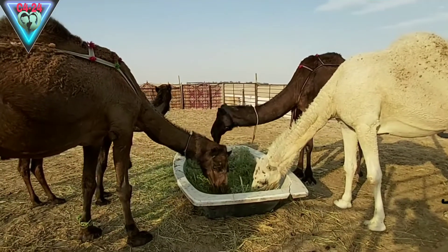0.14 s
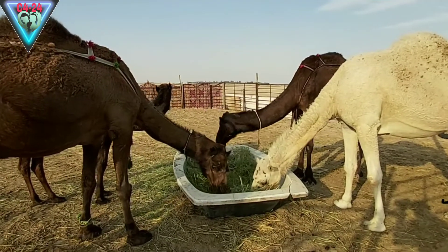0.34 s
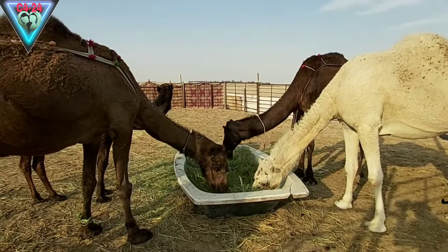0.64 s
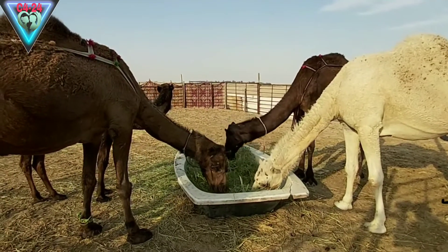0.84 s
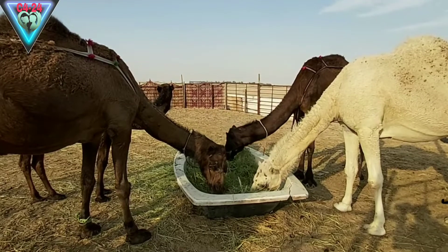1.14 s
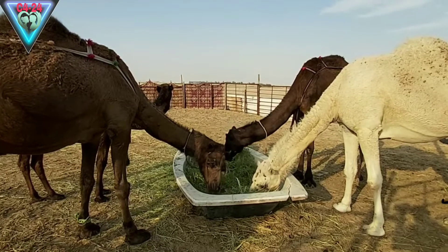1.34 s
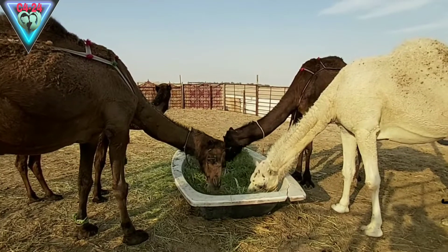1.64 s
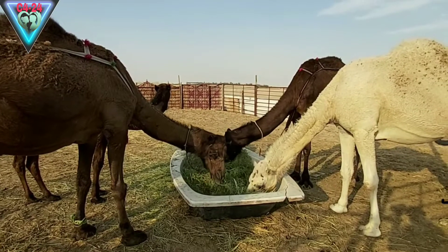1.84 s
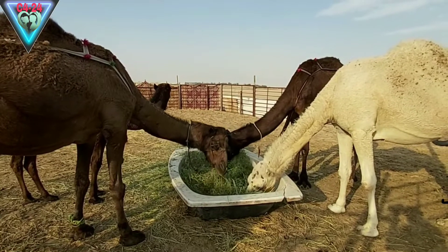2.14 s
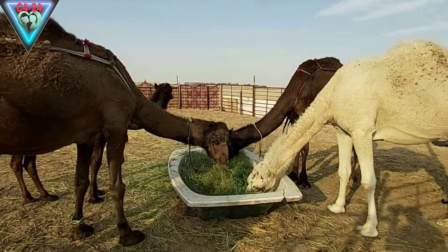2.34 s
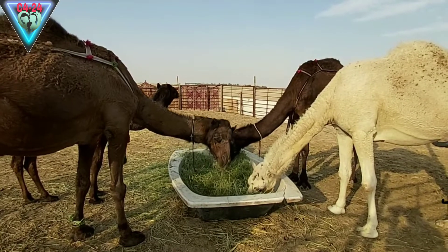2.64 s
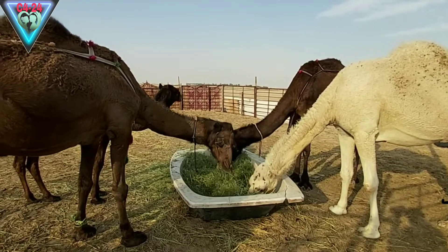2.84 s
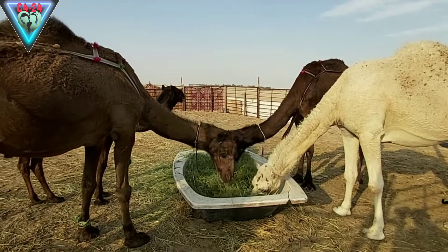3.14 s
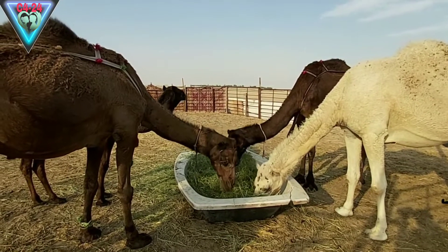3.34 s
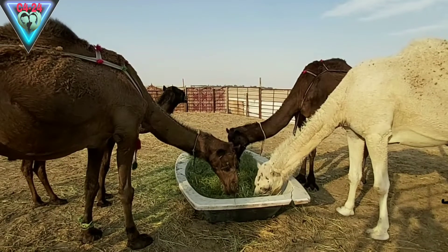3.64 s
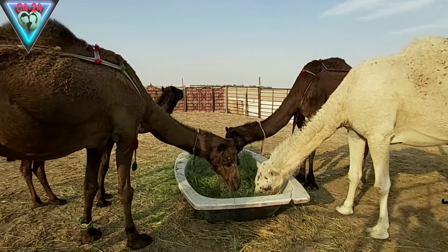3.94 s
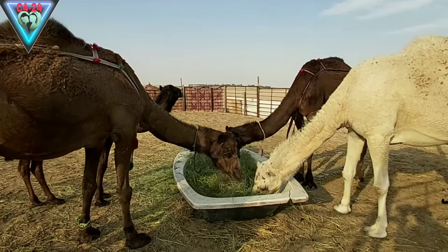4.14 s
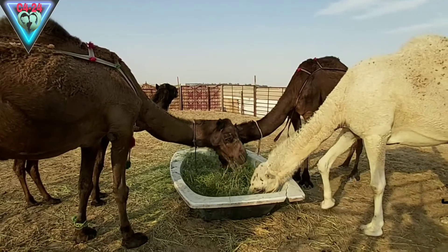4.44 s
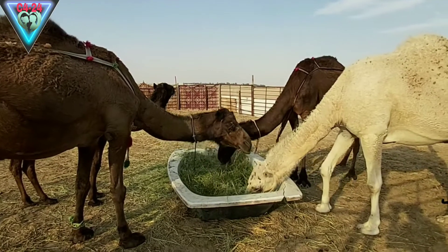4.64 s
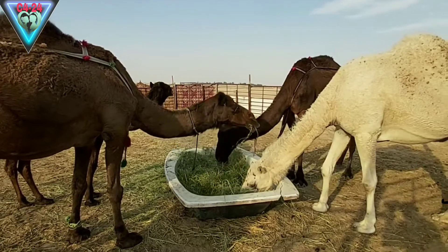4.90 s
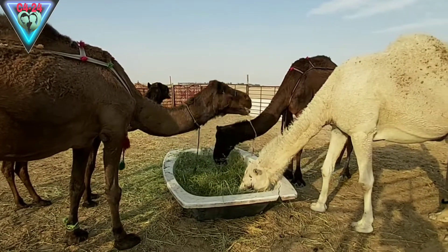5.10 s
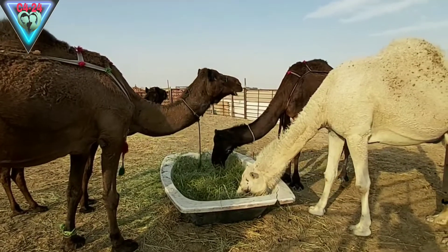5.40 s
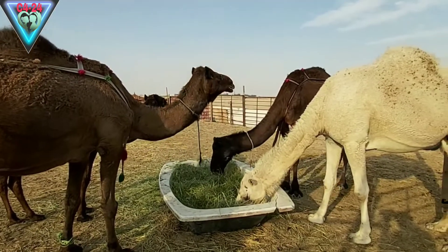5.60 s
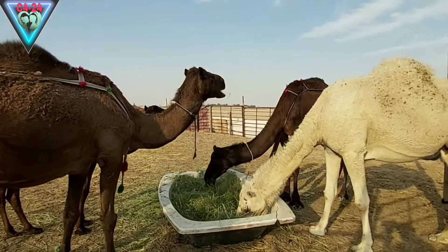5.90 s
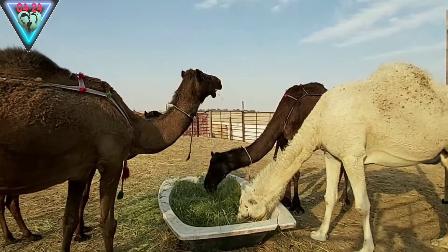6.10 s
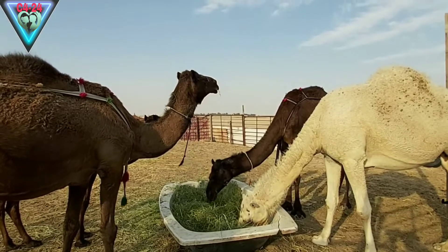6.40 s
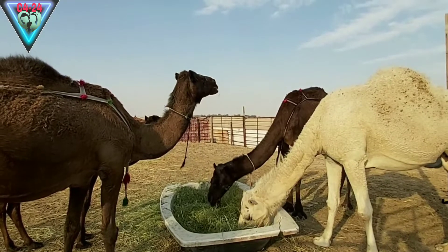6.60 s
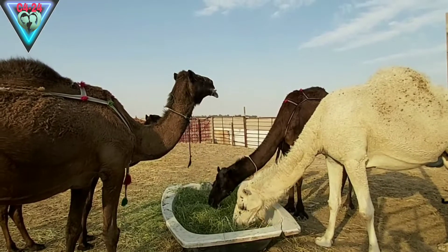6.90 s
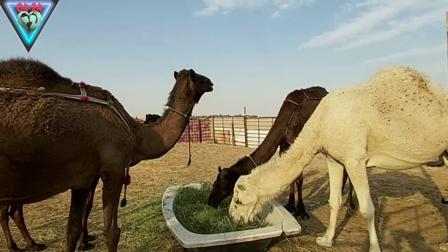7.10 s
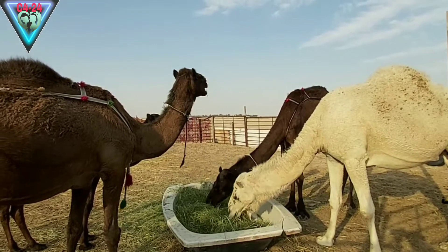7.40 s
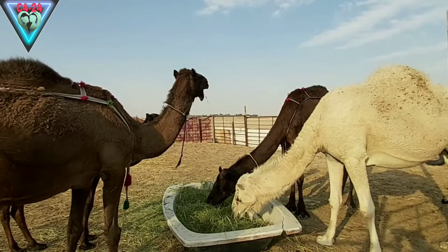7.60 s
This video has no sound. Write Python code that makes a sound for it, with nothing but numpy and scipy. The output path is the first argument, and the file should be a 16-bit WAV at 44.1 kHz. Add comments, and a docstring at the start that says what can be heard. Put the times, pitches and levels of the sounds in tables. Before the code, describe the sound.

Two husky rooster crows from the right, over low rumbling wind with dull thumps, faint hiss and small dry snaps of hay.

```python
"""Open farm pen, two microphone ports in gusty wind, a rooster off to the right crowing twice.
Wind and hiss are shaped noise that rises and falls by table; eddies thump the ports with short pushes.
Camels at a feed trough snap hay (decaying noise bursts) and rustle it (grains ringing the trough).
Each crow has a husky lead-in, short rougher notes and a long cleaner note that sags and ends in a rasp;
low croaks join the notes. A syrinx of a few strong partials, with throat noise, sings it all."""
import sys
import numpy as np
from scipy import signal
from scipy.fft import rfft, irfft
from scipy.io import wavfile
from scipy.ndimage import uniform_filter1d

SR = 44100
rng = np.random.default_rng(int(sys.argv[2]) if len(sys.argv) > 2 else 0)


def unload_audio(sound):
    """Save the sound as a 16-bit wav file, at the path given as the first command line argument."""
    columns = np.transpose(np.atleast_2d(sound))
    # keep every value between -1 and 1, then stretch to whole-number steps
    steps = np.round(np.clip(columns, -1, 1) * 32767)
    wavfile.write(sys.argv[1], SR, steps.astype(np.int16))


N = 341775
TIME = np.arange(N) / SR


def amp(db):
    """Decibels to gain."""
    return 10 ** (np.asarray(db) / 20)


def unit(x):
    """Scales to rms 1."""
    return x / np.sqrt(np.mean(x ** 2) + 1e-20)


def curves(rows, t):
    """The columns of a table, joined by straight lines in time."""
    s, *columns = np.transpose(rows)
    return [np.interp(t, s, c) for c in columns]


def colour(x, points):
    """Filters by a spectrum given as (f/Hz, level/dB) points."""
    hz, db = np.transpose(points)
    f = np.fft.rfftfreq(x.shape[-1], 1 / SR)
    gain_db = np.interp(np.log(f + 1), np.log(hz + 1), db)
    return irfft(rfft(x) * amp(gain_db), x.shape[-1])


def wander(shape, hz):
    """Smooth chance of rms 1, with changes up to about hz."""
    z = rng.standard_normal(shape)
    f = np.fft.rfftfreq(z.shape[-1], 1 / SR)
    return unit(irfft(rfft(z) / (1 + (f / hz) ** 4), z.shape[-1]))


def lowpass(x, hz):
    """The part of a sound below hz, without delay."""
    return signal.sosfiltfilt(signal.butter(2, hz, fs=SR, output="sos"), x)


def resonate(x, modes):
    """A bank of steep resonances: each one is passed twice."""
    out = 0
    for hz, width, db in modes:
        b, a = signal.iirpeak(hz, hz / width, SR)
        once = signal.lfilter(b, a, x)
        out = out + amp(db) * signal.lfilter(b, a, once)
    return out


def pan(db):
    """Left and right gains whose mean is 1, from the left port's level over the right in dB."""
    left = amp(np.atleast_1d(db))
    return 2 * np.array([left, np.ones_like(left)]) / (1 + left)


def add(mix, s, sound):
    """Mixes a sound in at time s."""
    part = mix[..., max(round(s * SR), 0):][..., :sound.shape[-1]]
    part += sound[..., :part.shape[-1]]


# wind at the ports: (t/s, level/dB before the trim)
GUSTS = [(0.0, -44.5), (0.11, -50.5), (0.15, -43.5), (0.19, -47), (0.37, -50.5), (0.5, -42.5),
         (0.58, -45.5), (0.67, -43), (0.71, -54), (0.88, -31.5), (0.97, -40), (1.12, -33.5), (1.19, -38.5),
         (1.25, -30.5), (1.47, -42.5), (1.66, -37), (1.7, -47), (1.79, -33.5), (1.83, -44), (1.9, -32),
         (1.94, -50.5), (1.98, -38.5), (2.11, -37), (2.46, -56), (2.63, -41.5), (2.81, -54.5), (2.91, -37),
         (3.0, -36.5), (3.02, -45.5), (3.3, -36), (3.43, -54.5), (3.5, -53), (3.58, -63.5), (3.67, -52),
         (3.75, -61.5), (3.84, -51.5), (3.95, -70), (4.1, -50), (4.29, -57.5), (4.58, -31.5), (4.62, -43),
         (4.77, -35.5), (5.05, -52.5), (5.2, -47), (5.52, -48.5), (5.65, -33.5), (5.72, -52.5), (5.76, -42),
         (6.28, -44.5), (6.32, -33.5), (6.37, -47.5), (6.48, -42.5), (6.52, -54), (6.65, -49.5),
         (6.78, -65.5), (6.86, -50), (7.1, -69.5), (7.21, -49.5), (7.34, -66), (7.75, -90)]
# spectrum of the turbulence: (f/Hz, relative level/dB per Hz)
BUFFET = [(13, -42), (22, -32.5), (49, 0.5), (97, 4), (232, -6), (300, -0.5), (338, 0), (381, -5.5),
          (421, -4.5), (523, -13.5), (777, -24), (1050, -33), (1350, -41), (2500, -51), (3250, -85.5),
          (5500, -120)]


def wind(level_db=3.0, lumps_db=5.0, lumps_hz=35, split_hz=230, brighten=0.32, usual_db=-41,
         low_side_db=5, high_side_db=-2, sway_db=2.0, sway_hz=6):
    """Each port has its own lumpy turbulence; stronger gusts shed smaller eddies and sound brighter."""
    gust_db = curves(GUSTS, TIME)[0]
    side_db = sway_db * wander(N, sway_hz)  # the ports take turns in the wind
    flow = unit(colour(rng.standard_normal((2, N)), BUFFET))
    rumble = lowpass(flow, split_hz)
    bright_db = brighten * np.minimum(gust_db - usual_db, 5)
    flicker = unit(amp(3.16 * wander((2, N), 66)))
    flutter = (flow - rumble) * amp(bright_db) * flicker
    lumps = amp(lumps_db * wander((2, N), lumps_hz))
    # eddies share out the strength of their gust: level evened over 1/8 s
    lumps /= np.sqrt(uniform_filter1d((lumps * flow) ** 2, SR // 8))
    both = rumble * pan(side_db + low_side_db) + flutter * pan(side_db + high_side_db)
    return both * lumps * amp(gust_db + level_db)


# swells of the fine hiss: (t/s, level/dB before the trim)
HISS = [(0.0, -67), (0.45, -72), (0.52, -63.5), (0.56, -62), (0.6, -67.5), (1.04, -66), (1.1, -63),
        (1.92, -62.5), (2.01, -60), (2.46, -62.5), (3.17, -62), (3.69, -68), (3.88, -64), (3.97, -68),
        (4.88, -59.5), (4.98, -63.5), (5.33, -60), (5.44, -64.5), (5.83, -61.5), (5.89, -65), (6.39, -64),
        (6.45, -61.5), (6.56, -70.5), (7.1, -69.5), (7.21, -67), (7.45, -74.5), (7.58, -68), (7.75, -75.5)]
# spectrum of the hiss: (f/Hz, relative level/dB)
HISS_COLOUR = [(1500, -6), (2400, -7.5), (3100, -8.5), (4300, -0.5), (6000, -1), (9000, -1.5),
               (12000, -1.5), (14500, -4.5)]
# spectrum of the still air of the yard: (f/Hz, relative level/dB per Hz)
AIR = [(24, -44), (40, 8), (83, 9), (192, -17), (372, 0.5), (654, -18), (1020, -12), (1300, -10.5),
       (2850, -32), (5380, -32.5), (14000, -59)]


def hiss(level_db=4.5, side_db=-5, flicker_db=1.02, air_db=-72, top_hz=8000, brighten=0.43, usual_db=-63):
    """A fine wide noise that brightens as it swells, over the still air of the yard."""
    swell_db = curves(HISS, TIME)[0]
    fine = unit(colour(rng.standard_normal((2, N)), HISS_COLOUR))
    body = lowpass(fine, top_hz)
    fine = body + (fine - body) * amp(brighten * (swell_db - usual_db))
    fine *= amp(swell_db + level_db + flicker_db * wander((2, N), 35)) * pan(side_db)
    air = unit(colour(rng.standard_normal((2, N)), AIR))
    return fine + amp(air_db) * air


# strongest eddies at the ports: (t/s, level/dB before the trim, f/Hz, left over right level/dB)
THUMPS = [(0.136, -31.5, 308, -8), (0.232, -38, 148, -6), (0.251, -29.5, 310, -5), (0.533, -29, 303, -4),
          (0.835, -21, 466, -18), (0.891, -16.5, 400, -5), (1.243, -16.5, 106, 0), (1.276, -21, 240, -2),
          (1.568, -23, 290, 2), (1.89, -25, 150, -11), (2.044, -24, 109.5, 2), (2.646, -24, 291, -3),
          (2.98, -23.5, 350, -17), (3.166, -24, 295, 1), (3.267, -28, 111, 19), (3.661, -32.5, 99, -2),
          (4.332, -30, 107.5, 1), (4.476, -26, 111, 7), (4.494, -21.5, 412, -3), (4.546, -27, 342, -11),
          (4.555, -20.5, 349, -1), (4.571, -30, 108, 8), (4.749, -19.5, 353, -5), (6.094, -28, 260, -1),
          (6.314, -26, 137, 0), (6.634, -35.5, 357, -6), (7.205, -36.5, 244, 1)]


def thumps(level_db=-3, cycles=0.93, spread=0.77):
    """An eddy gives each port a short push of a cycle or two, its phase (rad) differing by port."""
    out = np.zeros((2, N))
    t = np.arange(SR // 16) / SR
    turns = spread * rng.standard_normal((len(THUMPS), 2))
    for (s, db, hz, side_db), turn in zip(THUMPS, turns):
        u = t * hz / cycles  # 1 where the push is strongest
        push = u ** 2 * np.exp(2 * (1 - u)) * np.sin(2 * np.pi * hz * t + turn[:, None])
        add(out, s, amp(db + level_db) * pan(side_db) * push)
    return out


# dry stalks snapping: (t/s, starting level/dB before the trim, time to fall 60 dB/s, centre f/Hz)
SNAPS = [(.250, -54, 0.017, 3500), (3.043, -42, 0.028, 3500), (4.2, -42, 0.017, 5200),
         (4.86, -40.5, 0.25, 2400), (6.441, -28.5, 0.018, 2670), (6.482, -39, 0.057, 2980),
         (7.207, -46, 0.066, 1600), (7.519, -49.5, 0.024, 1800)]
# hay dragged in the trough: (t/s of the middle, length/s, level/dB before fades and pan)
SCUFFS = [(4.849, 0.049, -49.5), (6.443, 0.1, -48), (6.448, 0.01, -44), (7.2, 0.21, -59.5),
          (7.202, 0.029, -52.5), (7.237, 0.012, -54), (7.352, 0.068, -67), (7.394, 0.019, -57),
          (7.511, 0.21, -63)]
# resonances of the trough: (f/Hz, width of each pass/Hz, relative level/dB)
TROUGH = [(487, 107, 14), (1040, 400, 13), (1430, 1400, 1), (2170, 360, -13), (4740, 1200, -9)]


def hay(snap_db=-7, grain_db=3.0, side_db=-3):
    """Stalks snap as decaying noise, and bunches scrape as clumped grains ringing the trough."""
    out = np.zeros((2, N))
    t = np.arange(SR // 10) / SR
    for s, db, t60, hz in SNAPS:
        spectrum = [(hz / 8, -16), (hz / 2, -6), (hz, 0), (hz * 1.5, -3), (hz * 1.8, -13), (hz * 5, -20)]
        crack = unit(colour(rng.standard_normal((2, len(t))), spectrum))
        add(out, s, crack * amp(db + snap_db - 60 * t / t60))
    for s, length, db in SCUFFS:
        size = int(length * SR)
        # one part common to both ports, one part separate
        grains = rng.standard_normal(size) + 0.56 * rng.standard_normal((2, size))
        scrape = unit(resonate(grains * amp(grain_db * wander(size, 160)), TROUGH))
        fade = np.sin(np.pi * np.arange(size) / size)
        add(out, s - length / 2, amp(db) * scrape * fade)
    return out * pan(side_db)


def swell(t, start, end, edge):
    """Smooth attack, hold and smooth release."""
    return np.sin(np.pi / 2 * np.clip(np.minimum(t - start, end - t) / edge, 0, 1)) ** 2


# spells in which the syrinx beats strong-weak, adding half lines:
# (start t/s, end t/s, level/dB at 1.5, at 2.5 and at 3.5 times the pitch)
DOUBLING = [(1.475, 1.583, -73, -58, -55.5), (1.82, 2.391, -59, -58, -93)]
# resonances of throat and beak: (f/Hz, width of each pass/Hz, relative level/dB)
THROAT = [(885, 91, 21.5), (1804, 650, 12), (2400, 190, -3), (3790, 230, -1)]


def syrinx(t, hz, levels, rough, warble, jitter=0.054, jitter_hz=170, flutter=1.0, rasp_db=-2.0,
           chaos=0.37, warble_hz=31.45, warble_dip=14, tear=18, upper_db=-22):
    """The syrinx sings a few strong partials; when it turns rough they shake and noise fills the throat."""
    size = len(t)
    # below a threshold of roughness the membranes beat regularly
    rough = np.clip(rough - .12, 0, 1)
    # the warble flicks the pitch up, around an unchanged mean
    warble_phase = np.pi * warble_hz * (t - t[0]) + 0.17 * wander(size, 28)
    flick = warble * (2 * np.sin(warble_phase) ** 4 - .75)
    shake = jitter * rough * wander(size, jitter_hz) + 0.0013 * wander(size, 43)
    phase = 2 * np.pi * np.cumsum(hz * (1 + flick + shake)) / SR
    gains = [amp(db) for db in levels]
    gains += [gains[-1] * amp(upper_db - k) for k in range(4)]  # faint upper partials
    tone = np.zeros(size)
    for k, gain in enumerate(gains, 1):
        tone += gain * np.cos(k * phase) * (1 + flutter * rough * wander(size, 148))
    # the tone thins each time the warble flicks the pitch up
    tone *= np.clip(1 - warble_dip * flick, 0, 2)
    # rough cycles alternate unevenly between strong and weak, filling the gaps between partials
    tone *= 1 + chaos * rough * wander(size, 79) * np.cos(phase / 2)
    for start, end, *halves in DOUBLING:
        half_lines = sum(amp(db) * np.cos((k + .5) * phase) for k, db in enumerate(halves, 1))
        tone += swell(t, start, end, 0.32 * (end - start)) * half_lines
    # air escapes once a cycle, in clumps, and most where the warble tears the tone
    clumps = amp(3 * wander(size, 70))
    breath = rng.standard_normal(size) * (1 + np.cos(phase)) * clumps
    puffs = unit(resonate(breath, THROAT)) * (1 + tear * np.maximum(flick, 0))
    rasp = amp(rasp_db) * rough * np.hypot(gains[0], gains[1]) * puffs
    return np.sqrt(2) * tone + rasp  # root 2: partial levels are rms


CROAK_TOP_DB = -24  # partial 4 against partial 3
CROAK_DIP_HZ = 26.2  # the pitch is this much higher at the ends than in the middle, glide aside
CROAK_EDGE = 0.37  # attack and release, as a share of the length


def croak(start, end, pitch_hz, glide, first_db, second_db, third_db, rough):
    """With little air behind it the syrinx gives a short husky glide that dips in the middle."""
    t = np.arange(start, end, 1 / SR)
    late = t - (start + end) / 2
    hz = pitch_hz + glide * late + CROAK_DIP_HZ * (2 * late / (end - start)) ** 2
    levels = [first_db, second_db, third_db, third_db + CROAK_TOP_DB]
    return syrinx(t, hz, levels, rough, 0) * swell(t, start, end, CROAK_EDGE * (end - start))


NOTE_EDGE_S = 0.022  # attack and release
SCOOP, SCOOP_S = .1, 0.01002  # flat by this share of the pitch at both ends, fading over this time
ROUGH_ENDS, ROUGH_ENDS_S = .12, 0.098  # extra roughness as a note catches and breaks off
BEAK_HZ, BEAK_SLOPE_HZ = 3435, 12  # edge of the beak's upper resonance
BEAK_DB = -21.5  # partial 4 dims this much as it sinks below that edge


def note(loudness, start, end, pitch_hz, sag, arch_hz, third_db, fourth_db, rough, warble):
    """A note scoops up, arches, glides by its sag and drops off; it is roughest at its ends."""
    t = np.arange(start, end, 1 / SR)
    late = t - (start + end) / 2
    edge = np.minimum(t - start, end - t)
    hz = pitch_hz - sag * late - arch_hz * (2 * late / (end - start)) ** 2
    hz *= 1 - SCOOP * np.exp(-edge / SCOOP_S)
    dim_db = BEAK_DB * (1 + np.tanh((BEAK_HZ - 4 * hz) / BEAK_SLOPE_HZ)) / 2
    levels = curves(loudness, t) + [third_db, fourth_db + dim_db]
    rough = rough + ROUGH_ENDS * np.exp(-edge / ROUGH_ENDS_S)
    return syrinx(t, hz, levels, rough, warble) * swell(t, start, end, NOTE_EDGE_S)


def yard(x, t60, delay):
    """Scattered echoes from fences and ground, different at each port."""
    t = np.arange(SR // 2) / SR
    hits = rng.random((2, len(t))) < 1500 / SR  # about 1500 echoes a second
    taps = rng.standard_normal((2, len(t))) * hits * (t > delay) * amp(-60 * t / t60)
    taps /= np.linalg.norm(taps, axis=1, keepdims=True)
    return signal.fftconvolve(x[None], taps, axes=1)[:, :N]


# husky sounds before, between and after the notes: (start t/s, end t/s, middle f/Hz, glide/Hz per s,
# level/dB of partials 1, 2 and 3 in the bird, roughness 0-1 before the threshold)
CROAKS = [(0.724, 0.819, 813, 150, -71, -57, -76, 0.4), (0.784, 0.972, 692, -6, -53.5, -60, -85.5, .6),
          (1.003, 1.078, 850, 800, -52, -52.5, -59, 0.36),
          (1.096, 1.196, 710, -900, -51, -54.5, -60.5, 0.8),
          (1.164, 1.242, 846, 300, -37, -43.5, -53, 0.33), (1.447, 1.612, 695, 104, -52, -56.5, -63, 0.29),
          (2.637, 2.743, 712, 398, -48.5, -56.5, -80, 0.71), (2.683, 2.799, 970, 2, -53.5, -64, -83, 0.47),
          (2.701, 2.844, 803, -500, -56.5, -52.5, -72, 0.7), (4.70, 4.959, 696, 78, -54, -54.5, -58, 0.78),
          (4.822, 4.892, 713, 4, -55, -46, -58, 0.76), (5.037, 5.107, 783, 700, -50.5, -51.5, -57.5, 0.4),
          (5.352, 5.439, 785, -650, -45.5, -45.5, -53.5, 0.5),
          (5.494, 5.59, 744, 1006, -50.5, -50.5, -61, 0.54), (6.486, 6.567, 935, -500, -62, -55, -78, 0.54),
          (6.463, 6.53, 761, -800, -49.5, -56, -60, 0.5)]
# sung notes of the two crows: (start t/s, end t/s, middle f/Hz, sag/Hz per s (positive falls), arch/Hz,
# level/dB of partial 3, of partial 4 before the beak dims it, roughness 0-1 before ends and threshold,
# warble as a share of the pitch)
NOTES = [(1.028, 1.132, 954, -200, 70, -71, -84, .38, 0),
         (1.199, 1.489, 918.3, 146, 7, -65.5, -70.5, 0.12, 0.0036),
         (1.571, 2.663, 837, 54.5, 11, -79, -61, 0.14, 0.0022),
         (5.064, 5.391, 967.3, -110, 42, -68.5, -62, 0.32, 0.024),
         (5.544, 6.498, 860.6, 57.5, 2.83, -64.5, -59.5, 0.16, 0.0023)]
# loudness through each note, one list a note: (t/s, level/dB of partial 1, of partial 2, in the bird)
NOTE_LEVELS = [
    [(1.04, -30.5, -74), (1.054, -35, -42.5), (1.082, -48, -49), (1.1, -35, -41.5), (1.12, -31.5, -52)],
    [(1.21, -27.5, -59), (1.222, -38, -37), (1.246, -38, -52), (1.27, -42.5, -42), (1.32, -39.5, -42.5),
     (1.364, -34, -32), (1.414, -34, -35.5), (1.47, -36, -41.5)],
    [(1.585, -34.5, -37), (1.601, -42.5, -48), (1.711, -43, -35.5), (2.035, -40, -37), (2.381, -48, -44.5),
     (2.475, -44, -46.5), (2.553, -51.5, -36.5), (2.645, -43, -41.5)],
    [(5.085, -37.5, -50), (5.133, -41, -43.5), (5.167, -36.5, -48), (5.179, -38, -40), (5.217, -39, -37),
     (5.231, -37, -38), (5.327, -40, -39), (5.37, -37.5, -40)],
    [(5.565, -39.5, -45), (5.587, -43, -54), (5.805, -52, -40), (6.107, -52.5, -53.5), (6.155, -57, -45),
     (6.333, -50, -40), (6.371, -48.5, -53), (6.48, -46, -42.5)],
]


def rooster(near_db=-11, far_db=-25, fence_db=-26, fence_s=.065, shimmer_db=1.1):
    """Both crows come from the right; the camera's body shades the higher partials at the left port."""
    voice = np.zeros(N)
    for row in CROAKS:
        add(voice, row[0], croak(*row))
    for row, loudness in zip(NOTES, NOTE_LEVELS):
        add(voice, row[0], note(loudness, *row))
    voice *= amp(shimmer_db * wander(N, 19))  # moving air makes the level waver
    left = colour(voice, [(850, -2), (1700, -7), (3500, -6.5)])
    right = colour(voice, [(850, 0.18), (1700, 0.43), (3500, 3.0)])
    out = np.array([left, right])
    # near reflections arrive from the sides and widen the image, most in the upper partials
    near = yard(colour(voice, [(850, -6), (1700, 0)]), t60=.08, delay=.002)[0]
    # the fence answers with one bright, slightly smeared slap
    bright = colour(voice, [(850, 1), (1800, 13.3), (3700, 22.4)])
    add(out, fence_s, amp(fence_db) * yard(bright, t60=0.018, delay=0))
    far = yard(voice, t60=.45, delay=.02)
    return out + amp(near_db) * np.array([near, -near]) + amp(far_db) * far


def scene():
    """The wind, the feeding camels and the rooster."""
    return wind() + hiss() + thumps() + hay() + rooster()


EDGE_HZ = 14600


def record(dry):
    """The recorder's band limit: a steep low-pass at EDGE_HZ."""
    lowpass_taps = signal.firwin(701, EDGE_HZ, window=("kaiser", 9), fs=SR)
    return signal.oaconvolve(dry, lowpass_taps[None], "same", axes=1)


dry = scene()
out = record(dry)
unload_audio(out)
```